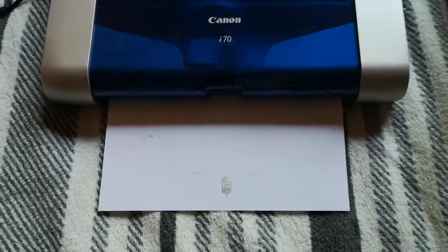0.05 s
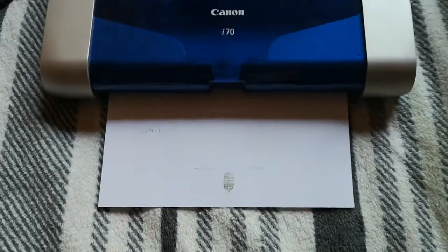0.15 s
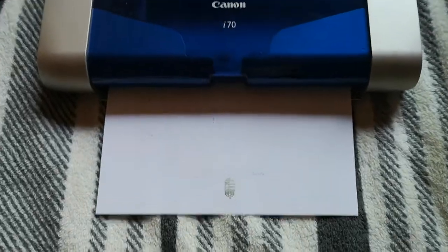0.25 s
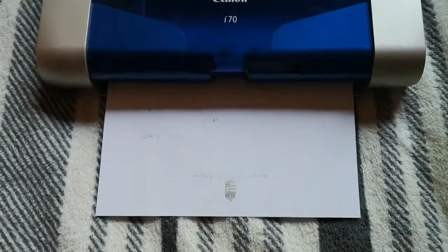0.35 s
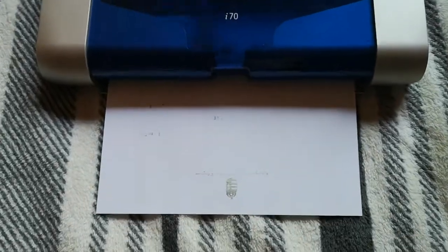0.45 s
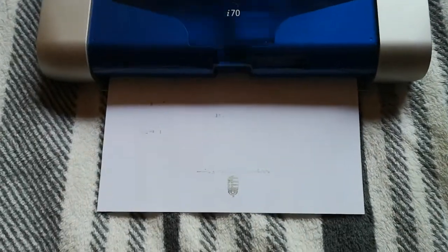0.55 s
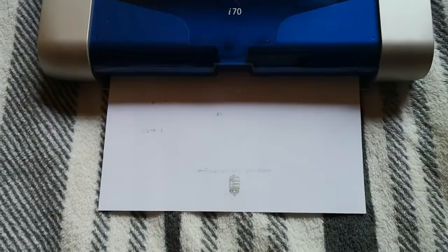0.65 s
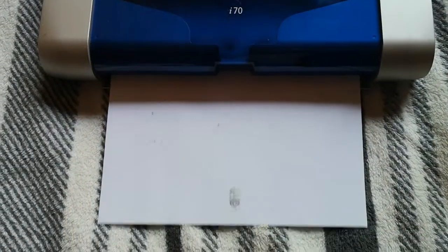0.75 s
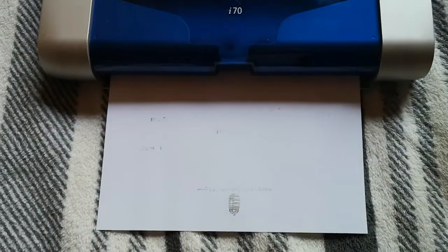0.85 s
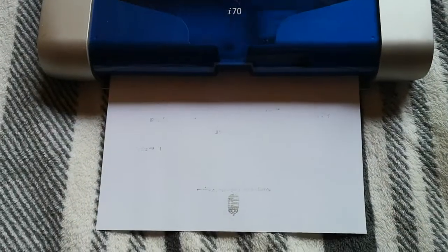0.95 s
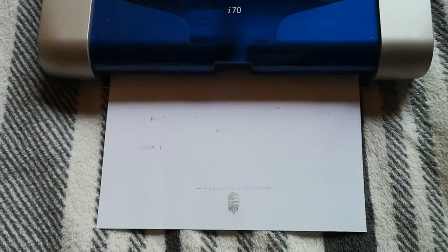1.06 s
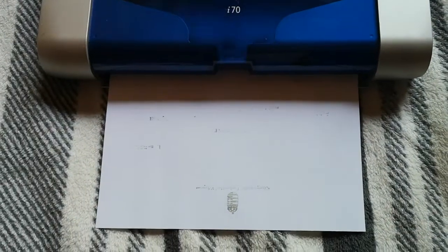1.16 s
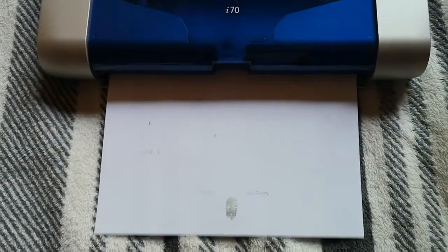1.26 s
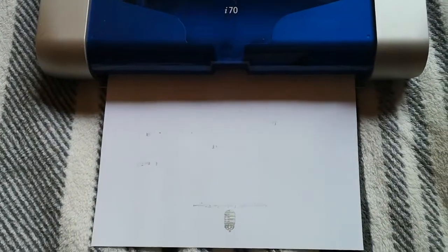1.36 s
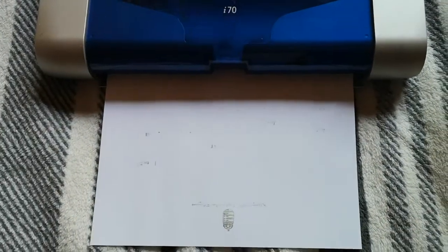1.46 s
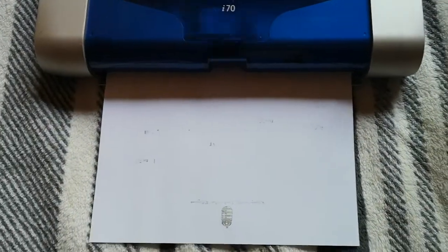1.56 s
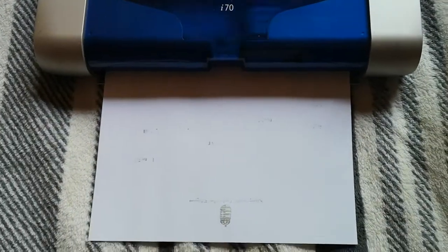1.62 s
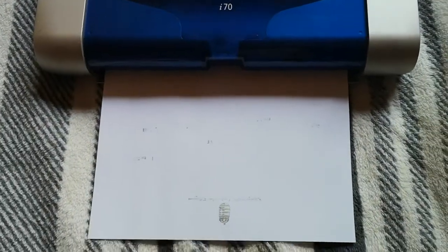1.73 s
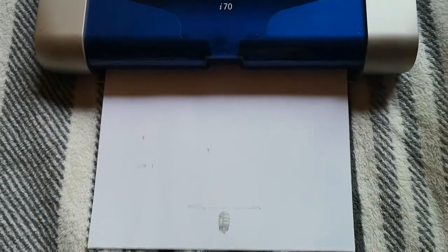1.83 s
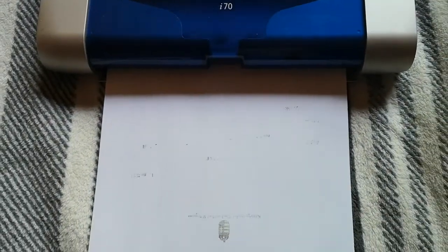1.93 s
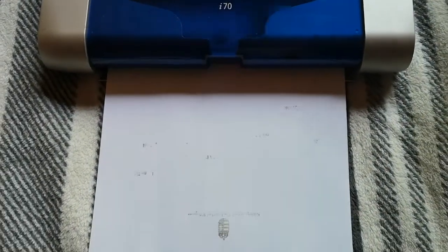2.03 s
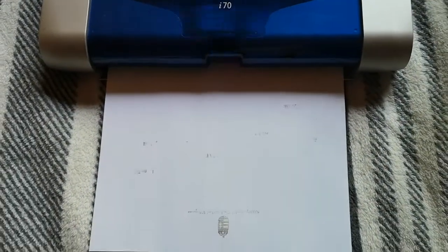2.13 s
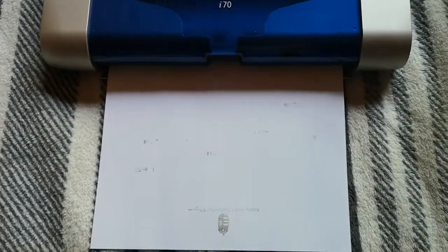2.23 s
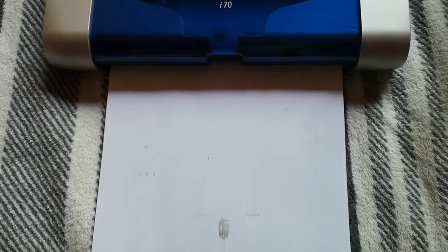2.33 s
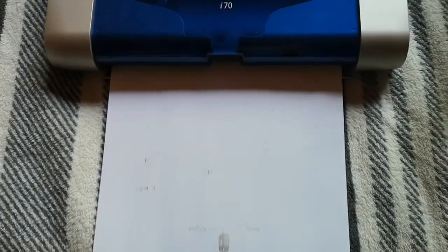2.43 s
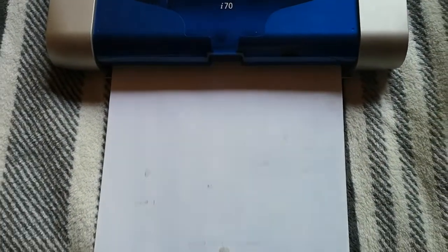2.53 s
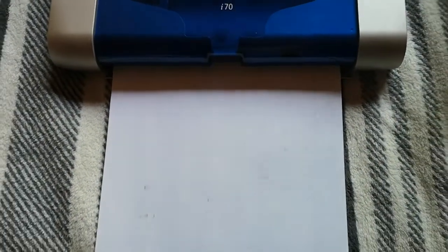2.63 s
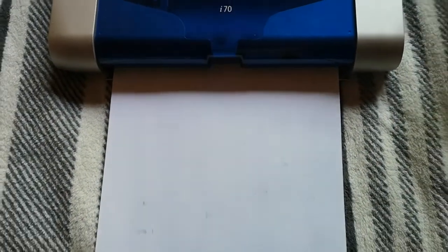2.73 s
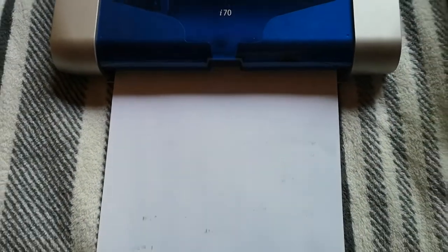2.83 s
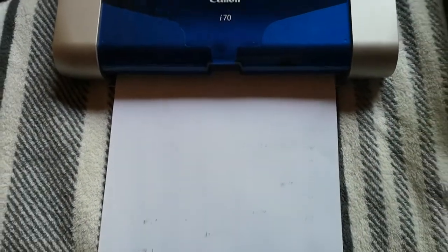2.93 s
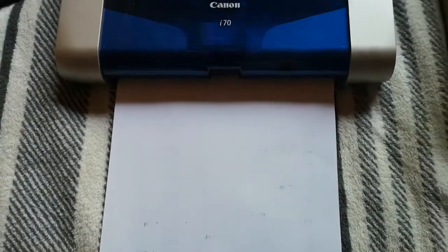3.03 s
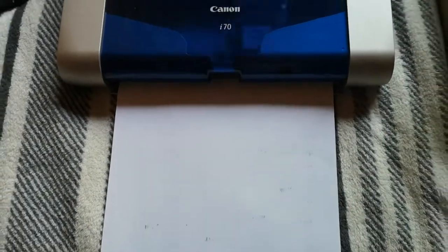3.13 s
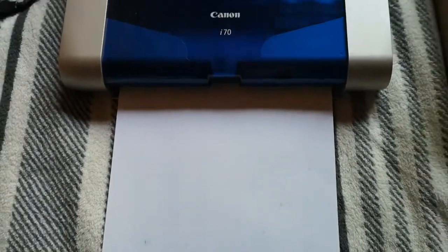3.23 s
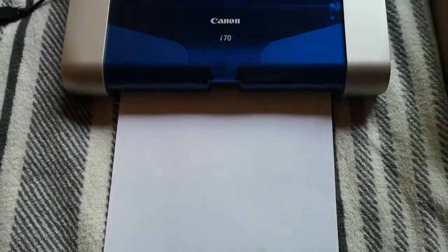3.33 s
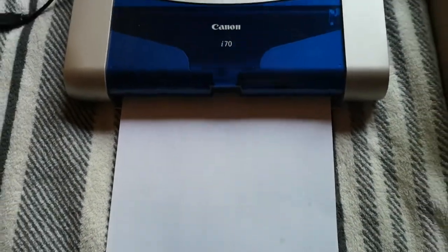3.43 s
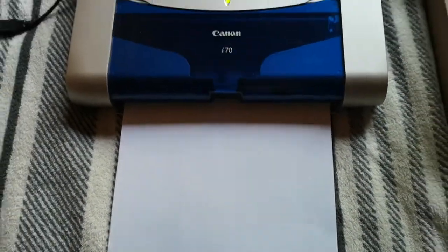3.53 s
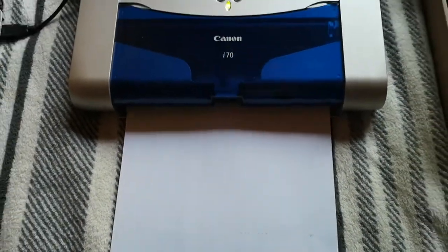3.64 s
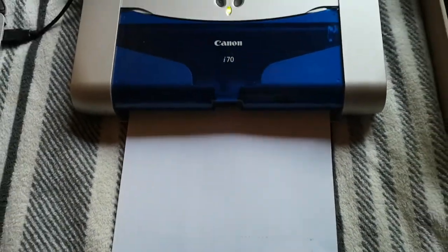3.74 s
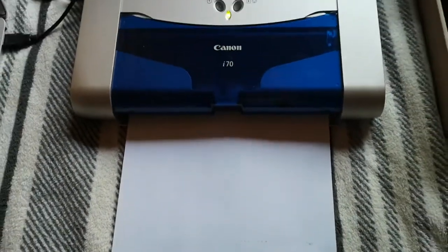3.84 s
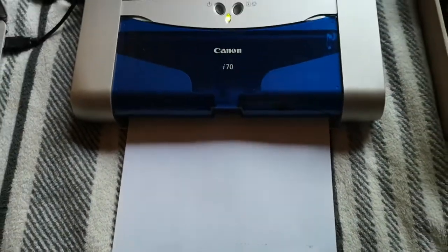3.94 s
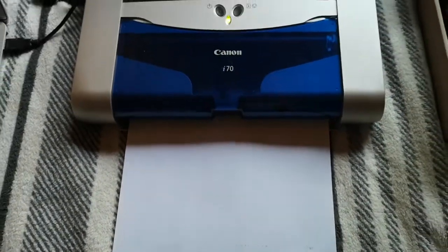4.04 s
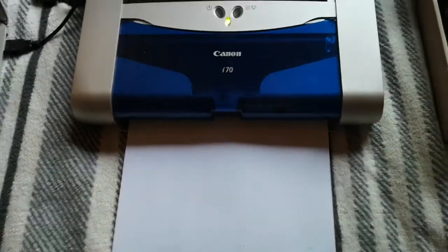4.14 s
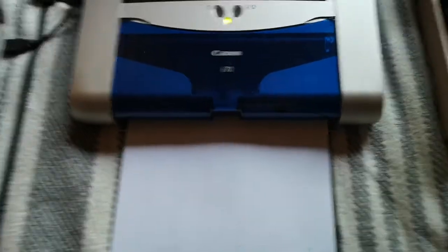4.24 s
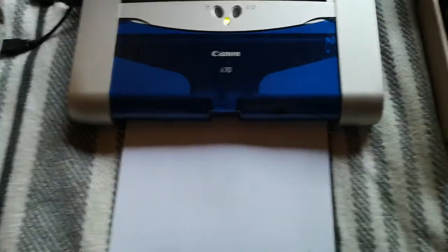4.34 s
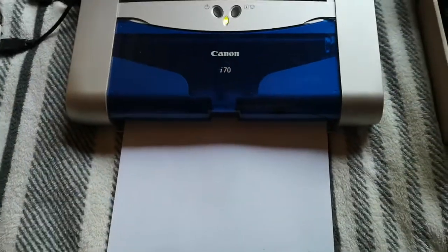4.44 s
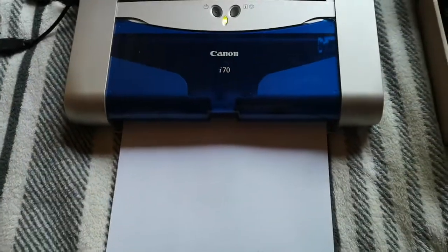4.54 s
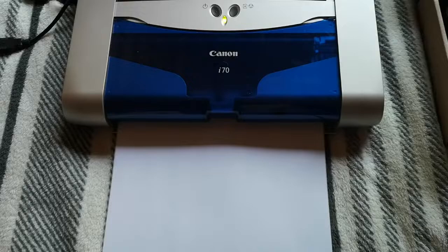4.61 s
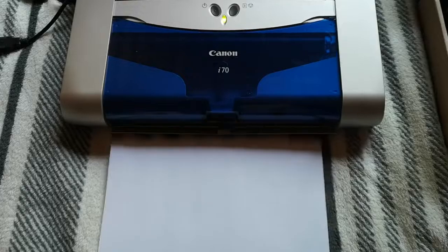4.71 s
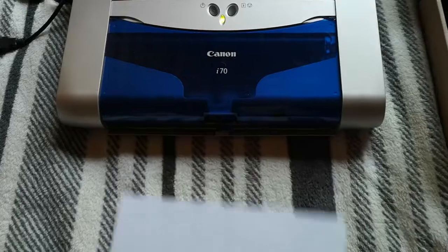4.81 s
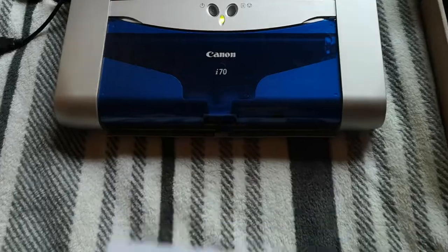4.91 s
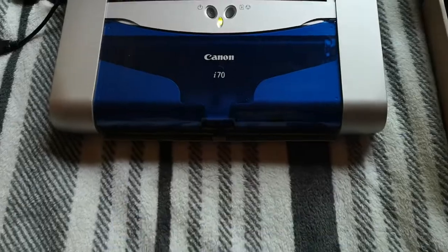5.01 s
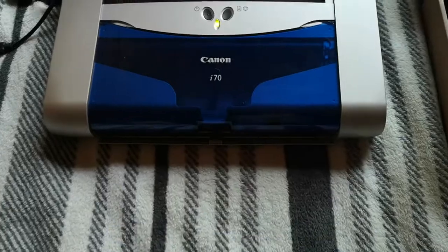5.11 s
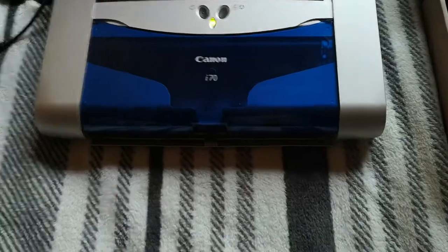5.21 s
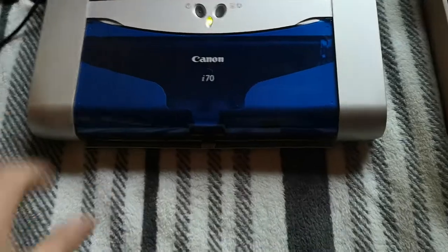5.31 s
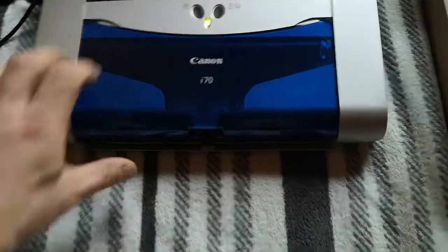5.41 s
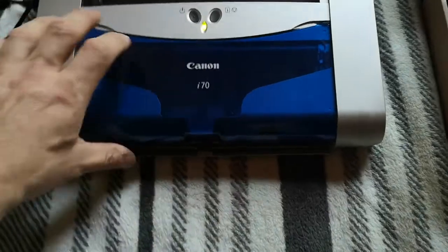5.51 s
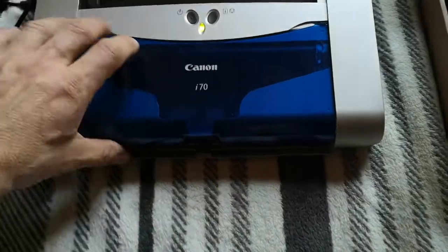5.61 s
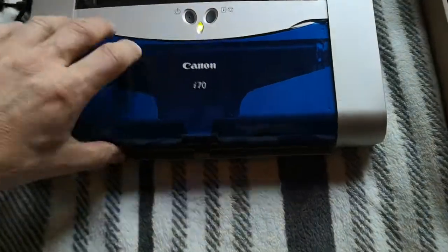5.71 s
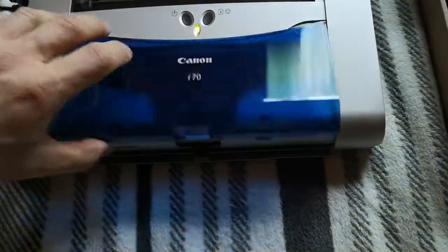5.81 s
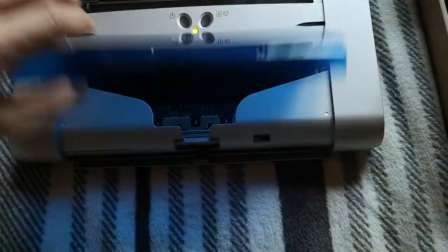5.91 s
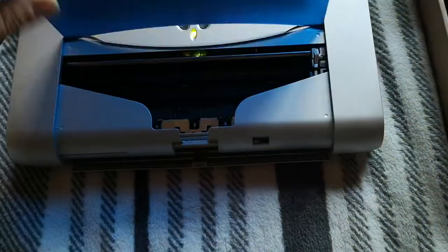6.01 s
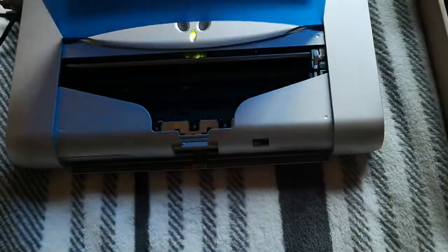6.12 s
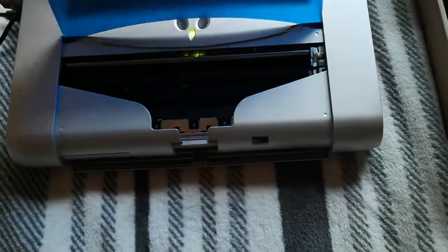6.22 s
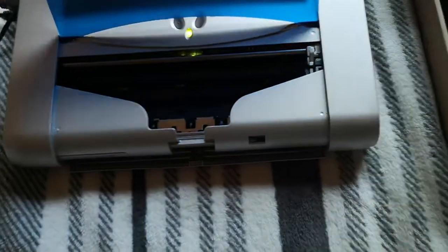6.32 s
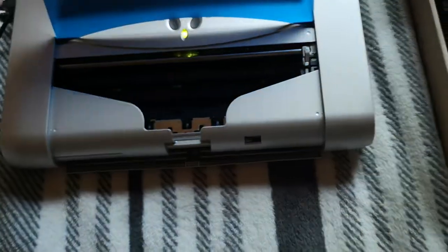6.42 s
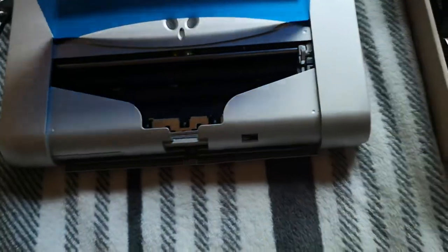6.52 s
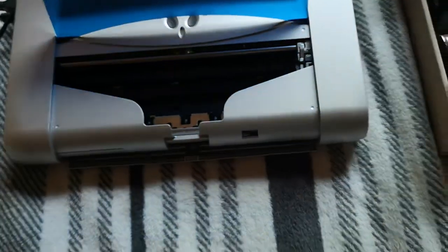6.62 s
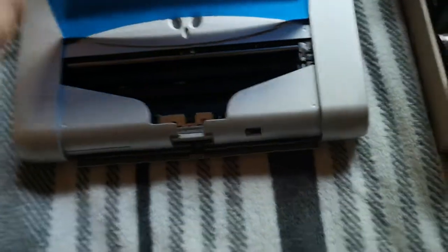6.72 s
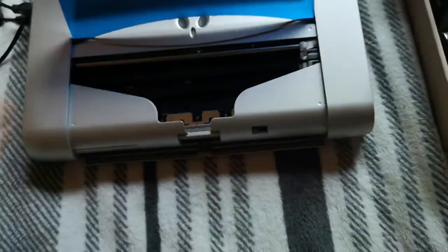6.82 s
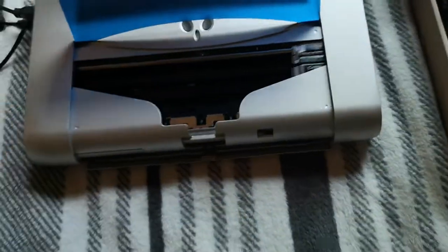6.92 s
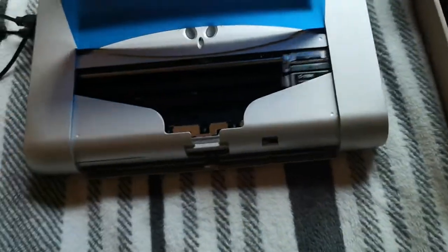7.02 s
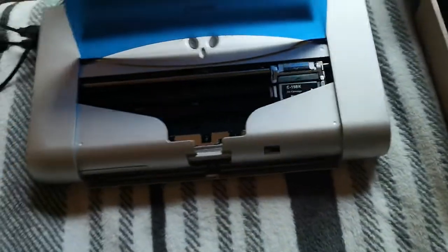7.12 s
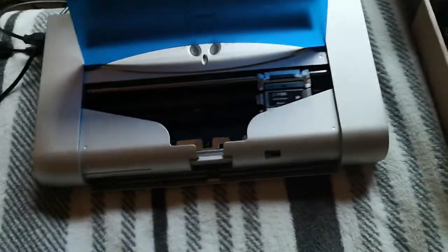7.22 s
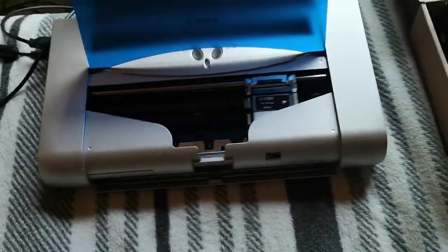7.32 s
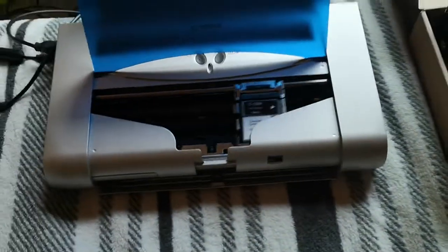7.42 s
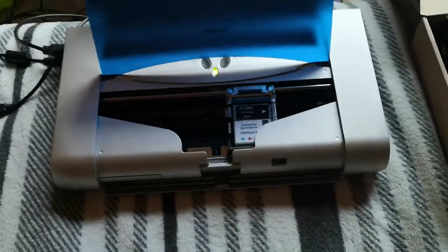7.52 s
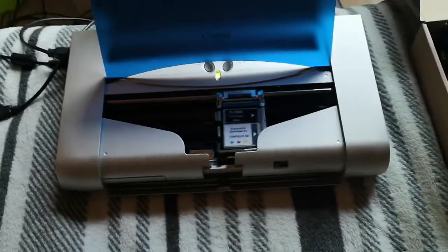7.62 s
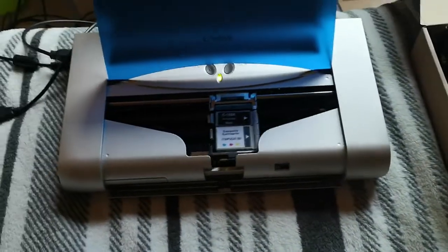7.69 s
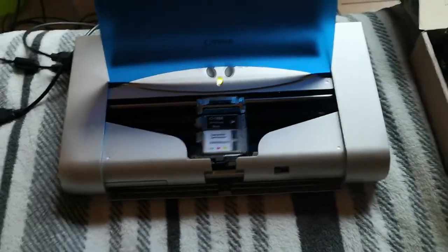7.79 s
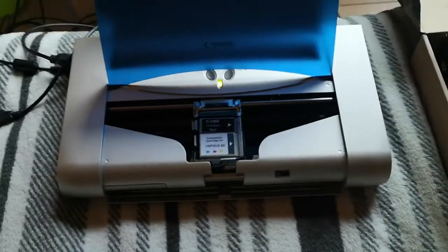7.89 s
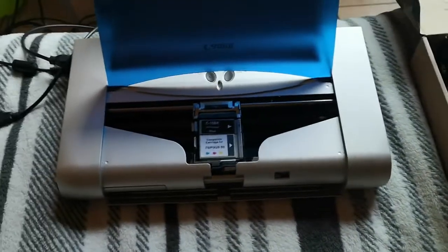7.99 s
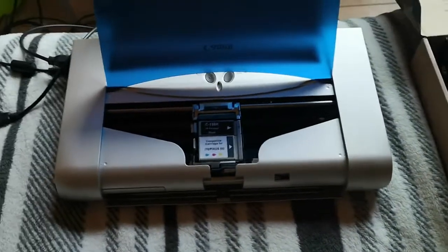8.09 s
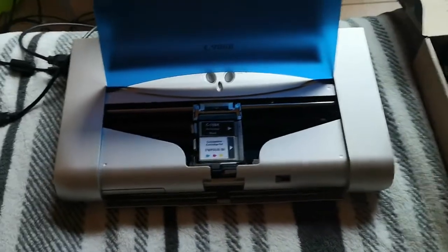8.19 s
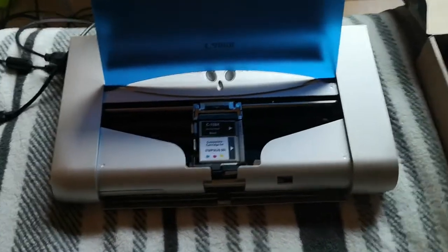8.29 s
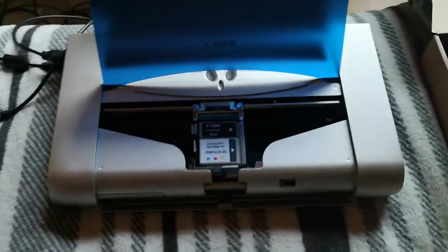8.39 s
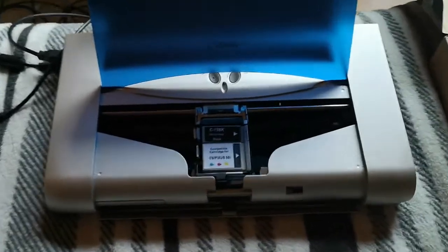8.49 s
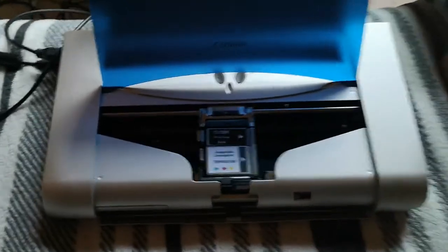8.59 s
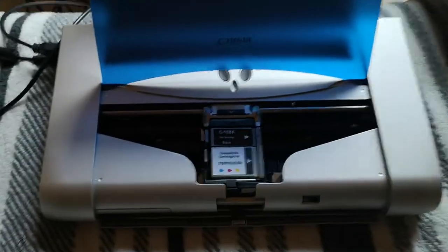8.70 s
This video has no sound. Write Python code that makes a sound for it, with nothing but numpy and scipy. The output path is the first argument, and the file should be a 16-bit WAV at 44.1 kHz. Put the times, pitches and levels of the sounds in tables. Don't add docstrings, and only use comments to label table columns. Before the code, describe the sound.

Close up, printer gears grind and knock, the print head whirs back and forth, then a sharp lid snap and a faint creeping carriage.

```python
import sys
import numpy as np
from scipy import signal
from scipy.fft import rfft, irfft, next_fast_len
from scipy.io import wavfile
from scipy.ndimage import uniform_filter1d

SR = 44100
rng = np.random.default_rng(int(sys.argv[2]) if len(sys.argv) > 2 else 0)


def wrap_up_sound(samples):
    columns = np.atleast_2d(samples).T
    tamed = np.clip(columns, -1, 1)
    steps = np.round(tamed * 32767).astype(np.int16)
    wavfile.write(sys.argv[1], SR, steps)


def magnitude_from_level(level_db):
    exponent = np.asarray(level_db, float) / 20
    return 10 ** exponent


N = 385875
SIZE = next_fast_len(N + 8192)
HZ = np.maximum(np.arange(SIZE // 2 + 1) * SR / SIZE, 1)
TIME_S = np.arange(N) / SR

# frequency in Hz, level in dB per Hz.
MIC_HISS = [(180, -29), (300, -6.5), (584, -21), (634, -19), (1660, -14.5), (1970, -12), (2140, -12),
            (3950, -21.5), (4910, -18.5), (8220, -23.5), (16000, -34)]
MIC_HISS_DB = -74
# level in dB, turning points (s, Hz), twin level in dB where it differs.
WHINES = [(-83, [(1.78, 8900), (1.82, 9050), (1.88, 9750), (1.96, 8800)]), (-84, [(2.14, 8200),
          (2.22, 7550), (2.29, 8200), (2.345, 7500), (2.42, 8400), (2.49, 7600)]), (-88, [(4.12, 5800),
          (4.165, 8600)], -40), (-86, [(6.68, 4750), (6.74, 5150)], -40), (-84, [(4.17, 8300), (4.22, 8800),
          (4.24, 8750), (4.27, 8950), (4.305, 8300)], -40), (-84, [(4.175, 7900), (4.2, 7950), (4.24, 7750),
          (4.27, 7850), (4.32, 7400)], -40), (-83, [(4.385, 7600), (4.437, 9300), (4.487, 7500),
          (4.54, 9900), (4.6, 7600)], -40), (-88, [(4.45, 10000), (4.49, 8500), (4.53, 9900)], -40),
          (-89, [(4.57, 9700), (4.63, 7300)], -40), (-85, [(6.65, 8100), (6.67, 8500), (6.7, 8250),
          (6.745, 9150), (6.8, 7850), (6.83, 8200)], -40), (-87, [(6.65, 8000), (6.69, 7950), (6.745, 8450),
          (6.795, 7150), (6.82, 7400)], -40), (-85, [(6.86, 9500), (6.88, 9700), (6.92, 8300), (6.97, 9100),
          (7.0, 8500)], -40), (-86, [(6.86, 8500), (6.875, 8600), (6.92, 7500)], -40), (-86, [(6.915, 8000),
          (6.94, 7900), (6.98, 8150)], -40), (-88, [(7.07, 8100), (7.16, 9300)])]
TWIN_RATIO, TWIN_DB, LOW_TWIN_RATIO, LOW_TWIN_DB = .905, -4, .57, -7
# time in seconds, level in dB.
GRIP_LEVEL = [(0.0, -59), (0.63, -57), (0.83, -65), (0.97, -57.5), (1.19, -59), (4.0, -58.5), (6.63, -61),
              (7.36, -55.5), (7.99, -55), (8.14, -52.5), (8.75, -59)]
# frequency in Hz, level in dB per Hz.
GRIP_SPECTRUM = [(7.1, -34.5), (12, 3.5), (27, -1), (54, -10.5), (204, -25), (317, -40.5), (379, -61),
                 (600, -48), (780, -82.5), (1320, -120)]
# start in seconds, frequency in Hz, peak in dB, t60
# in seconds.
SOFT_BUMPS = [(5.89, 355, -46.5, 0.12), (7.362, 44.5, -32.5, 0.26), (7.48, 190, -64, 0.075),
              (7.68, 171, -64, 0.071), (7.92, 220, -67, .07), (8.3, 200, -62, .08),
              (8.107, 26.9, -40, 0.28), (8.269, 35.5, -41, 0.14)]
# start in seconds, end in seconds, level in dB.
ARM_REACH = (5.42, 6.02, -73)
# frequency in Hz, likeness from -1 to 1.
PORT_LIKENESS = [(60, 1), (180, 0.99), (550, 0.73), (1650, 0.29), (4970, 0.063), (15000, -0.12)]
# frequency in Hz, left minus right in dB.
PORT_TILT = [(60, 0), (110, -0.5), (200, 0.5), (380, -1.5), (700, -1), (1290, -8), (2380, -8), (4400, 1.5),
             (8120, -5), (15000, -18.5)]
COHERENT = .4
ROOM_T60_S, ROOM_DB = 0.17, -12.5

# start in seconds, end in seconds, frequency in Hz, level in dB.
CREAKS = [(5.97, 6.07, 1470, -59), (5.96, 6.06, 1310, -60), (6.065, 6.1, 1660, -57),
          (6.17, 6.235, 1350, -64), (6.25, 6.32, 1540, -53), (6.335, 6.39, 1510, -57),
          (6.61, 6.65, 1800, -58), (6.605, 6.645, 1500, -61), (6.605, 6.625, 4050, -67),
          (6.97, 7.01, 1520, -68), (6.745, 6.775, 2950, -70), (6.605, 6.63, 2420, -66)]
# peak in seconds, swell in dB/s, fade in dB/s, dull level in dB, bright in dB re dull.
STROKES = [(4.22, 200, 30, -73, -17), (4.33, 250, 200, -67.5, 0.1), (4.47, 60, 40, -69, -7),
           (4.842, 170, 206, -61, -3), (5.105, 159, 350, -65.5, -10), (4.95, 31, 41, -73.5, -1.2),
           (5.753, 36, 33, -70.5, 4.5), (4.76, 300, 100, -69, -7), (5.94, 34.5, 43, -68, -11),
           (5.9, 68, 60, -61.5, -8), (6.11, 145, 173, -59, -8), (6.35, 24, 98, -75.5, -2.5),
           (6.2, 120, 95, -64.5, -16), (6.9, 39, 19, -71.5, -10.5)]
STEEPEN = 1.78
# frequency in Hz, level in dB per Hz.
RUB_SPECTRUM = [(180, -29), (300, -5.5), (440, -9.5), (603, -20.5), (774, -12.5), (946, -10), (2170, 2.5),
                (3700, -12), (4910, -11.5), (7440, 2.5), (10600, -20), (14700, -19), (16000, -29.5)]
# frequency in Hz, width in Hz, lift in dB.
RUB_MODES = [(2174, 300, 2.5), (5000, 1700, 10.5), (5780, 500, 2), (7300, 840, 0), (9140, 780, 11)]
# start in seconds, peak in dB, thud in dB re peak, snap in dB re peak, t60 in seconds.
TAPS = [(4.318, -43, -22, -34, 0.087), (4.7528, -51.5, -11, 0.5, 0.078), (4.8051, -56, -20, -10, .05),
        (4.8211, -52, -22, -12, 0.085), (4.838, -57.5, -22, -2, .06), (5.066, -57, -23, -23, .07),
        (5.0997, -55, -27, -4, .06), (5.109, -64, -22, 5, 0.046), (5.197, -71, -3, 7.5, 0.11),
        (5.72, -62, -14, -20, .06), (5.8025, -56, 7.5, -5, 0.053), (5.86, -48.5, -7.5, -9, 0.068),
        (5.887, -25.5, -8.5, 5.5, 0.089), (5.9052, -29.5, -16, 3, 0.14), (6.071, -48.5, -10.5, 0.5, 0.39),
        (6.078, -60, -12, -5, 0.094), (6.11, -54, -2, -17.5, .06), (6.137, -55.5, 6.5, -18, 0.065),
        (6.167, -45, -3, -30, 0.044), (6.2544, -39, -11, -16, 0.09), (6.284, -45, -46, -30, 0.073),
        (6.3385, -55, -12, -30, 0.16), (6.37, -50, -16, -25, 0.051), (6.614, -58, -36, -1.5, 0.16),
        (6.621, -62, -20, -12, .07), (6.656, -51, -22, -20, .05), (6.715, -60, -20, -20, .05),
        (6.733, -57, -18, -18, 0.062), (6.669, -64.5, 4.5, -23, 0.13), (6.876, -59, 5.5, -23, 0.1),
        (6.9485, -75, 7.5, -11, 0.23), (8.0124, -65, -2, -16, 0.067)]
# frequency in Hz, level in dB per Hz.
PLASTIC = [(88, -19), (150, -1), (231, -13.5), (270, -2.5), (309, -25.5), (466, -11), (689, 0), (871, -3),
           (2020, 1), (6020, -21), (9080, -23), (14800, -65.5), (16000, -52.5)]
# frequency in Hz, width in Hz, lift in dB.
PLASTIC_MODES = [(1510, 770, 6), (1880, 240, 5), (2650, 170, 6), (5600, 730, 1)]

# start in seconds, end in seconds, drive in dB, rail in dB, crossing of the ribs in seconds.
SWEEPS = [
    (0.09, 0.386, -62.5, -68.5, .3274),
    (0.572, 0.872, -58.5, -63, .6455),
    (1.07, 1.387, -64.5, -69.5, 1.3179),
    (1.62, 1.941, -59, -63.5, 1.6915),
    (2.172, 2.475, -64.5, -65, 2.4179),
    (3.123, 3.308, -59, -59.5, 3.1666),
]
# start in seconds, end in seconds, drive in dB, rail in dB.
CREEP = (7, 8.03, -79.5, -71.5)
TURN_S, CREEP_TURN_S, FIRST_KICK_S, CREEP_KICK_S, SECOND_KICK = .033, .054, .005, 6.9956, .43
# frequency in Hz, width in Hz, level in dB.
FRAME = [(612, 66, 0.6), (759, 80, -9.5), (174.7, 15, 2.5)]
# frequency in Hz, width in Hz, level in dB.
RAIL = [(1262, 67, 8), (1107, 29, -13), (1450, 24, -11.5)]
# frequency in Hz, width in Hz, level in dB.
FAST_RAIL = [(1218, 22, -2), (1279, 22, .1), (1160, 25, -10)]
FAST_KICK = .3
# frequency in Hz, width in Hz, level in dB.
CASE = [
    [(1850, 110, 2.5), (1970, 60, -3), (2250, 110, -1), (2586, 200, -10.5)],
    [(1460, 30, 0.5), (1696, 45, -3), (1822, 68, 3.5), (2245, 90, 1), (2400, 55, -4), (2630, 200, -13)],
]
# frequency in Hz, width in Hz, lift in dB.
HOLLOW = [(396, 200, -6), (950, 250, -5)]
# time in seconds, level in dB.
CREEP_RING = [(7, 2), (7.15, 0.5), (7.4, 3), (7.6, 0.5), (7.8, -0.8), (8.03, 0.5)]
# frequency in Hz, level in dB per Hz.
SLIDE = [(1760, -34.5), (3000, -5), (3900, 4), (4400, -2), (5770, -3), (8990, -4), (10300, -15),
         (15000, -21.5)]
# frequency in Hz, width in Hz, lift in dB.
SLIDE_MODES = [(7700, 400, 3), (9200, 500, 3)]
# frequency in Hz, gain in dB.
LID_OPEN = [(3000, -3.5), (5000, -13.5), (7500, 5), (12000, 5)]
# seconds from the crossing time when going out, level in dB.
RIBS = [(-.097, -8.5), (-.085, -8), (-.035, -7), (-.024, 0), (-.012, -4.5), (0, -1.5), (0.0094, -1.5)]
RIB_DB, RIB_T60_S = -64, 0.041
RAMP_S, BRAKE_S, CREEP_BRAKE_S = 0.068, 0.053, .012
LATE_RING_S = 0.075
FRAME_RE_DRIVE_DB = np.array([3, -5, -8.5, -6.5])
CASE_RE_DRIVE_DB = np.array([0.5, 0, 0.5, -8])
RAIL_RUN_DB, RAIL_TILT_DB = np.array([-4.5, 0, 0, -12.5]), 0.5
SLIDE_DB, SLIDE_RUN_DB = -71.5, np.array([-4, 0, 0, -7.5])
CREEP_SLIDE_DB, CREEP_FRAME_DB = -3.5, -5

# start in seconds, end in seconds, gear load in dB, clutch clunk peak in dB.
FEED = [
    (-.1, 0.068, -46.5, -40),
    (0.3811, 0.545, -45, -30),
    (0.8694, 1.049, -45, -27.5),
    (1.417, 1.586, -45.5, -45),
    (1.9575, 2.149, -45, -31),
    (2.4844, 3.099, -46, -32.5),
    (3.35, 3.999, -47, -47.5),
]
# frequency in Hz, level in dB per Hz.
GEARBOX = [(120, -42.5), (200, -12.5), (432, -12.5), (696, -3.5), (899, -12.5), (1080, -5.5), (1680, -8.5),
           (2020, -2.5), (4120, -12.5), (6050, -15.5), (7680, -12.5), (13600, -34), (16000, -47)]
# frequency in Hz, width in Hz, lift in dB.
GEAR_MODES = [(318, 56, -3.5), (590, 25, 2.5), (696, 36, 4.5), (806, 90, 4.5), (900, 54, -2),
              (1760, 470, 6), (2207, 270, 5), (4700, 460, 1), (7440, 760, 4), (9130, 500, 7)]
# frequency in Hz, width in Hz, level in dB.
HUM = [(127.8, 11, 2), (197, 9.7, -6), (240, 17, -9.5)]
# frequency in Hz, width in Hz, level in dB.
BRAKE_HUM = [(187, 16, 0)]
BRAKE_HUM_DB = [-21.5, -19, -15, -13, -20.5]
SPIN_UP_S, SLOW_S, STOP_S = 0.039, 0.051, 0.023
SPEED_DB = np.array([-7.5, 0, 0, -5, -17.5])
HUM_STRAIN_DB = np.array([5.5, 0, 2.75, 0, -6])
HUM_RE_DB, HISS_RE_DB, HISS_FOLLOWS = -11.5, -6, 2.8
SHEET_GONE_S, SHEET_GONE_DB = 3.79, -12.5
# start in seconds, peak in dB, touch before it in dB re peak, snap in dB re peak.
DROPS = [(0.4968, -19, -20, -23), (1.4474, -21, -26, -7), (2.0177, -20, -5, -12.5),
         (2.5537, -20, -4.5, -15.5), (2.6998, -18.5, -3.5, -13), (2.8466, -17.5, -6.5, -12),
         (2.9918, -16.5, -15, -15), (3.45, -22.5, -2.5, -8.5), (3.5981, -24.5, 2, -8), (3.743, -23, -3, -7),
         (3.89, -22.5, -4, -8)]
TOUCH_LEAD_S, TOUCH_DULL_DB, DROP_THUD_DB = .0055, -5.5, -17.5
# start in seconds, peak in dB, rebound in dB re peak.
CATCHES = [(.4244, -25, -6.5), (0.9495, -24.5, -11), (1.5177, -23, -11), (2.0878, -24, -10),
           (2.6236, -24.5, -9.5), (2.7697, -25, -5.5), (2.9161, -23.5, -11), (3.5217, -26.5, -0.7),
           (3.6668, -29.5, 1), (3.814, -28, -1.5), (3.9369, -34, 3.5)]
REBOUND_S, CATCH_THUD_DB, CATCH_SNAP_DB, CLUNK_THUD_DB, CLUNK_SNAP_DB = .0153, -15, -15, -14, -22.5
# start in seconds, peak in dB, snap in dB re peak.
TICKS = [(.008, -29, -10.5), (.047, -32.5, -19.5), (0.5307, -33.5, -12), (0.88, -32, -15),
         (2.518, -37.5, -21), (2.4898, -34, -27), (2.9653, -35.5, 4), (3.1, -33, -20), (3.083, -35, -26),
         (1.541, -36, -10), (1.558, -36.5, -18), (.57, -46.5, -21), (1.616, -53, -29), (3.388, -30, -22.5)]
# seconds from it (negative before), peak in dB, thud in dB re
# peak, snap in dB re peak.
NEAR_DROP = [(-.016, -38, -13.5, -21.5), (.013, -36, -8.5, -19.5), (.030, -33.5, -16.5, -19.5),
             (.048, -38.5, -5, -21)]
# seconds from it, peak in dB, thud in dB re peak, snap in dB re peak.
AFTER_CATCH = [(.005, -38, -22.5, -5), (.024, -37.5, -4.5, -20.5), (.048, -45, -13.5, -9.5)]
LONG_FEED_S = .3
# time in seconds, hardness.
BARE_GEARS = [(1.5, 0.012), (3.45, .22)]
# frequency in Hz, level in dB, t60 in seconds.
DROP_RING = [(694, -8.5, 0.039), (761.4, -12, 0.049), (1849, -3, .03), (2002, -1, .028), (2234, -3, 0.026),
             (2330, -10, .025), (2670, -7.5, 0.028), (3064, -12.5, 0.026), (3746, -14, 0.02),
             (4610, -12.5, 0.022), (7740, -10, .022)]
# frequency in Hz, level in dB, t60 in seconds.
CATCH_RING = [(584, -9.5, .035), (690, -13, 0.028), (791, -12.5, .03), (1270, -13, .02),
              (1510, -10.5, 0.018), (1780, -5, .02), (2004, 3.5, .018), (2270, -3.5, .02),
              (2720, -11, 0.017)]
CAM_RING_DB, CAM_RATTLE_DB, CAM_VARIES_DB, CAM_RISE_CYCLES = -0.92, -5.5, 1.8, 0.91


def in_time(tables, edge_s=.004):
    rows = []
    for table in tables:
        off = [-130] * (len(table[0]) - 1)
        rows.append([table[0][0] - edge_s] + off)
        rows += [list(row) for row in table]
        rows.append([table[-1][0] + 9 * edge_s] + off)
    s, *columns = np.transpose(rows)
    return [np.interp(TIME_S, np.maximum.accumulate(s), column) for column in columns]


def at_hz(points):
    hz, value = np.array(points).T[:2]
    return np.interp(np.log(HZ), np.log(hz), value)


def lifted(points, modes=()):
    lift_db = sum(db / (1 + (2 * (HZ - hz) / width) ** 2) for hz, width, db in modes)
    return magnitude_from_level(at_hz(points) + lift_db)


def resonant(modes):
    return sum(magnitude_from_level(db) / (1 + (2 * (HZ - hz) / width) ** 2) ** 0.56 for hz, width, db in modes)


def band(low_hz, high_hz):
    return 1 / np.sqrt((1 + (low_hz / HZ) ** 6) * (1 + (HZ / high_hz) ** 6))


def filtered(x, gain):
    return irfft(rfft(x, SIZE) * gain, SIZE)[..., :N]


def colour(x, gain):
    cepstrum = irfft(np.log(gain / np.sqrt(np.mean(gain ** 2)) + 1e-5), SIZE)
    cepstrum[1:SIZE // 2] *= 2
    cepstrum[SIZE // 2 + 1:] = 0
    return filtered(x, np.exp(rfft(cepstrum)))


def drift(rate):
    r = np.exp(-80 * np.pi * rate / SR)
    slow = signal.lfilter([1], [1, -2 * r, r * r], rng.standard_normal(N // 40 + 2002))[2000:]
    return np.interp(np.arange(N) / 40, np.arange(len(slow)), slow / slow.std())


def noise():
    return rng.standard_normal((2, N))


def dying(at_s, peak_db, t60_s, rise_s=.0004):
    out = np.zeros(N)
    for s, db, t60 in zip(at_s, peak_db, np.broadcast_to(t60_s, len(at_s))):
        start, t60 = int(s * SR), max(t60, .005)
        t = np.arange(int(t60 * SR)) / SR
        shape = (magnitude_from_level(db - 60 * t / t60) * (1 - np.exp(-t / rise_s)))[:N - start]
        out[start:start + len(shape)] += shape
    return out


def blows(at_s, peak_db, thud_db, snap_db, t60_s, gain, trim_db, crack_db, hard):
    def shake(db, t60, low_hz, high_hz):
        crack = np.zeros(N)
        crack[(at_s * SR).astype(int) + 20] = magnitude_from_level(db + crack_db)
        return colour(crack + noise() * dying(at_s, db, t60), gain * band(low_hz, high_hz))
    thud = shake(peak_db + thud_db, 1.52 * t60_s, 100, 1070)
    ring = shake(peak_db, t60_s, 1200, 5300)
    snap = shake(peak_db + snap_db, 0.6 * t60_s, 4500, 25000)
    snap += hard * signal.lfilter([1, -2, 1], [1], snap)
    return magnitude_from_level(trim_db) * (magnitude_from_level(4.5) * thud + ring + magnitude_from_level(6.0) * snap)


def microphone_hiss():
    return magnitude_from_level(MIC_HISS_DB + 1.5) * colour(noise(), lifted(MIC_HISS) * band(290, 17000))


def whine():
    out = np.zeros(N)
    for db, rows, *own_db in WHINES:
        s, hz = np.transpose(rows)
        t = np.arange(int(s[0] * SR), int(s[-1] * SR))
        place = np.interp(t / SR, s, np.arange(len(s)))
        eased = np.floor(place) + (1 - np.cos(np.pi * (place % 1))) / 2
        turns = 2 * np.pi * np.cumsum(np.interp(eased, np.arange(len(s)), hz)) / SR
        twin_db = min([TWIN_DB, *own_db]) + 4 * np.sin(9 * t / SR * np.pi)
        low_twin_db = min([LOW_TWIN_DB, *own_db])
        tone = np.sin(turns) + magnitude_from_level(twin_db) * np.sin(TWIN_RATIO * turns)
        tone += magnitude_from_level(low_twin_db) * np.sin(LOW_TWIN_RATIO * turns)
        out[t] = magnitude_from_level(db + 8) * signal.windows.tukey(len(t), .3) * tone
    return out * magnitude_from_level(2 * drift(25))


def grip():
    level_db = in_time([GRIP_LEVEL])[0] + 1.9 * drift(6.4)
    rumble = colour(noise() * magnitude_from_level(level_db), lifted(GRIP_SPECTRUM) * band(4.1, 700))
    bumps = sum(-np.sin(2 * np.pi * hz * (TIME_S - s)) * dying([s], [db], t60, rise_s=0.0041)
                for s, hz, db, t60 in SOFT_BUMPS)
    start, end, reach_db = ARM_REACH
    swell = np.sin(np.pi * np.clip((TIME_S - start) / (end - start), 0, 1))
    rustle = magnitude_from_level(reach_db) * swell * colour(noise()[0], band(170, 300) ** 2)
    return bumps + rustle + rumble[0] + magnitude_from_level(-19.0) * rumble[1] * [[1], [-1]]


def room(x):
    t = np.arange(8000) / SR
    tail = rng.standard_normal((2, len(t))) * magnitude_from_level(-60 * t / ROOM_T60_S) * (t > .004)
    tail /= np.sqrt(np.sum(tail ** 2, axis=1, keepdims=True))
    return magnitude_from_level(ROOM_DB) * filtered(x, rfft(tail, SIZE) * band(140, 7000))


def two_ports(paths):
    alike, tilt_db = np.clip(at_hz(PORT_LIKENESS), -.99, .999), at_hz(PORT_TILT) / 2
    direct, scattered = rfft(paths, SIZE)
    mid = direct * np.sqrt((1 + alike) / 2)
    side = 1j * COHERENT * direct + np.sqrt(1 - COHERENT ** 2) * scattered
    side = side * np.sqrt((1 - alike) / 2)
    return irfft([(mid + side) * magnitude_from_level(tilt_db), (mid - side) * magnitude_from_level(-tilt_db)], SIZE)[:, :N]


def hinge():
    out = np.zeros(N)
    for start, end, hz, db in CREAKS:
        t = np.arange(int((end - start) * SR)) / SR
        wobble = np.cumsum(rng.standard_normal(4410))[:len(t)] * .065
        turns = 2 * np.pi * hz * t[:len(wobble)] + wobble
        tone = np.sin(turns) + .2 * np.sin(1.34 * turns) + .1 * np.sin(2.35 * turns)
        swell = np.abs(np.sin(np.pi * t[:len(tone)] / t[-1])) ** 0.21
        out[int(start * SR):][:len(tone)] += magnitude_from_level(db) * tone * swell
    return out * magnitude_from_level(2 * drift(50))


def rub_levels():
    t, dull, bright = np.arange(0, N / SR + .01, .002), 1e-13, 1e-13
    for s, swell, fade, dull_db, bright_db in STROKES:
        lost_db = np.where(t < s, swell * (s - t), fade * (t - s))
        power = magnitude_from_level(2 * (dull_db - 10 * (lost_db / 10) ** STEEPEN))
        dull, bright = dull + power, bright + power * magnitude_from_level(2 * bright_db)
    return [np.interp(TIME_S, t, 10 * np.log10(power)) for power in (dull, bright)]


def handling():
    dull_db, bright_db = rub_levels()
    rubbing, grain = lifted(RUB_SPECTRUM, RUB_MODES), magnitude_from_level(2.0 * drift(58.4))
    rub = colour(noise() * grain * magnitude_from_level(dull_db - 5.0), rubbing * band(240, 2400))
    rub += colour(noise() * grain * magnitude_from_level(bright_db + 1.5), rubbing * band(2800, 17000))
    s, peak_db, thud_db, snap_db, t60 = np.transpose(TAPS)
    plastic = lifted(PLASTIC, PLASTIC_MODES)
    return rub + blows(s, peak_db, thud_db, snap_db, t60, plastic, trim_db=-8, crack_db=1, hard=0.39)


def sweep_levels():
    def sweep(start, end, drive_db, rail_db, way, frame_db=0, slide_db=SLIDE_DB, brake_s=BRAKE_S):
        along = way * np.array([-1, -1, 1, 1])
        return np.transpose([[start, start + RAMP_S, end - brake_s, end],
                             drive_db + frame_db + FRAME_RE_DRIVE_DB,
                             rail_db + RAIL_RUN_DB - RAIL_TILT_DB * along,
                             drive_db + CASE_RE_DRIVE_DB,
                             slide_db + SLIDE_RUN_DB])
    fast = [sweep(*row[:4], (-1) ** k) for k, row in enumerate(SWEEPS)]
    return in_time(fast + [sweep(*CREEP, -0.86, CREEP_FRAME_DB, SLIDE_DB + CREEP_SLIDE_DB, CREEP_BRAKE_S)])


def ribs():
    ticks = [(row[4] + (-1) ** k * lag, RIB_DB + db) for k, row in enumerate(SWEEPS) for lag, db in RIBS]
    s, db = np.transpose(ticks)
    return dying(s, db + rng.normal(0, 2.7, len(s)), RIB_T60_S)


def pole_kicks():
    turns = [(row[0] + FIRST_KICK_S, TURN_S) for row in SWEEPS] + [(CREEP_KICK_S, CREEP_TURN_S)]
    ends = [row[1] for row in SWEEPS] + [CREEP[1]]
    kicks = [s + turn_s * (np.arange(34)[:, None] + [0, SECOND_KICK]).ravel() for s, turn_s in turns]
    return np.concatenate([k[k < end] for k, end in zip(kicks, ends)])


def carriage():
    frame_db, rail_db, case_db, slide_db = sweep_levels()
    kicks = pole_kicks()
    strength_db = rng.normal(0, 2.0, len(kicks))
    throb = dying(kicks, strength_db, .04, rise_s=0.0023)
    throb /= np.sqrt(np.mean(throb[throb > 0] ** 2))
    push = np.zeros(N)
    push[(kicks * SR).astype(int)] = 30 * magnitude_from_level(strength_db)
    shake = .3 * noise()
    early = np.arange(N) < CREEP[0] * SR / 2
    fast_rail = colour(FAST_KICK * push + shake, resonant(FAST_RAIL))
    rail = np.where(early, fast_rail, colour(push + shake, resonant(RAIL)))
    for start, *_ in SWEEPS[1:4:2]:
        rail_db -= 10.0 * np.interp(TIME_S - start, [-.01, 0, LATE_RING_S, 1.2 * LATE_RING_S], [0, 1, 1, 0])
    rail_db += np.interp(TIME_S, *np.transpose(CREEP_RING), left=0)
    rail *= magnitude_from_level(rail_db) / np.sqrt(uniform_filter1d(rail ** 2, size=8820))
    frame = colour(noise() * (0.41 + 0.41 * throb) * magnitude_from_level(frame_db), resonant(FRAME))
    drive = noise() * (0.59 + 0.13 * throb) * magnitude_from_level(case_db)
    out_way = np.searchsorted([row[0] - .02 for row in SWEEPS], TIME_S) % 2
    case = colour(drive * out_way, resonant(CASE[0])) + colour(drive * (1 - out_way), resonant(CASE[1]))
    drag = (0.74 + 0.23 * throb) * magnitude_from_level(slide_db + 1.2 * drift(47)) + ribs()
    slide = colour(noise() * drag, lifted(SLIDE, SLIDE_MODES))
    body = filtered(rail + frame + case, lifted([(20, 0), (20000, 0)], HOLLOW))
    return body + np.where(early, slide, filtered(slide, lifted(LID_OPEN)))


def feed_levels():
    spans = [np.transpose([[start, start + SPIN_UP_S, end - SLOW_S, end - STOP_S, end],
                           db + SPEED_DB,
                           db + HISS_RE_DB + HISS_FOLLOWS * SPEED_DB,
                           db + HUM_RE_DB + HUM_STRAIN_DB,
                           db + np.array(BRAKE_HUM_DB)]) for start, end, db, _ in FEED]
    grind_db, hiss_db, hum_db, brake_db = in_time(spans)
    hiss_db = hiss_db + SHEET_GONE_DB * (np.arange(N) > SHEET_GONE_S * SR)
    return grind_db, hiss_db, hum_db, brake_db


def in_long_feed(s):
    return any(start < s < end - STOP_S and end - start > LONG_FEED_S for start, end, *_ in FEED)


def knocks():
    rows = [(s, db, CLUNK_THUD_DB, CLUNK_SNAP_DB) for s, _, _, db in FEED[1:]]
    rows += [(s, db, CATCH_THUD_DB, snap_db) for s, db, snap_db in TICKS]
    for s, db, touch_db, snap_db in DROPS:
        db, snap_db = db + CAM_RATTLE_DB, snap_db - CAM_RATTLE_DB
        rows.append((s - TOUCH_LEAD_S, db + touch_db, DROP_THUD_DB, snap_db + TOUCH_DULL_DB))
        rows.append((s, db, DROP_THUD_DB, snap_db))
    for s, db, rebound_db in CATCHES:
        db += CAM_RATTLE_DB
        rows.append((s, db, CATCH_THUD_DB, CATCH_SNAP_DB))
        rows.append((s + REBOUND_S, db + rebound_db, CATCH_THUD_DB, CATCH_SNAP_DB))
    for hits, followers in ((DROPS, NEAR_DROP), (CATCHES, AFTER_CATCH)):
        rows += [(hit[0] + lag, *levels) for hit in hits for lag, *levels in followers
                 if in_long_feed(hit[0] + lag)]
    return np.transpose(rows)


def cam():
    out, t = np.zeros((2, N)), np.arange(3500) / SR
    drops = [hit for s, db, touch_db, _ in DROPS for hit in ((s, db), (s - TOUCH_LEAD_S, db + touch_db))]
    catches = [hit for s, db, rebound_db in CATCHES for hit in ((s, db), (s + REBOUND_S, db + rebound_db))]
    for hits, modes in ((drops, DROP_RING), (catches, CATCH_RING)):
        hz, mode_db, t60 = np.array(modes).T[..., None]
        rise = 1 - np.exp(-t * hz / CAM_RISE_CYCLES)
        shape = magnitude_from_level(mode_db - 60 * t / np.maximum(t60, .005)) * rise
        phase = [[[0]], [[1]]] * rng.uniform(0, 2 * np.pi, hz.shape)
        paths = shape * np.sin(2 * np.pi * hz * t + phase)
        paths /= np.abs(paths[0].sum(axis=0)).max()
        for (s, db), vary in zip(hits, rng.standard_normal((len(hits), len(modes)))):
            start = int(s * SR)
            out[:, start:start + len(t)] += magnitude_from_level(db + CAM_VARIES_DB * vary) @ paths
    return magnitude_from_level(CAM_RING_DB) * out


def feed():
    grind_db, hiss_db, hum_db, brake_db = feed_levels()
    gearbox = lifted(GEARBOX, GEAR_MODES)
    chatter = magnitude_from_level(2.3 * drift(160) + .8 * drift(25))
    grind = colour(noise() * chatter * magnitude_from_level(grind_db + 0.2), gearbox * band(170, 4800))
    hiss = colour(noise() * chatter ** 0.26 * magnitude_from_level(hiss_db + 2.5), gearbox * band(4400, 17000))
    hum = colour(noise() * magnitude_from_level(hum_db), resonant(HUM))
    hum += colour(noise() * magnitude_from_level(brake_db), resonant(BRAKE_HUM))
    hard = np.interp(TIME_S, *np.transpose(BARE_GEARS))
    rattle = blows(*knocks(), 0.028, gearbox, trim_db=-4.5, crack_db=12.0, hard=hard)
    return grind + hiss + hum + cam() + rattle


def scene():
    near = magnitude_from_level(2.5) * two_ports(feed() + carriage() + handling() + hinge())
    return near + room(near) + grip() + microphone_hiss() + whine() * magnitude_from_level([[-2.5], [2.5]])


def band_limit(x):
    return signal.sosfilt(signal.butter(12, 16470, fs=SR, output="sos"), x)


def record(dry):
    top_cut = signal.cheby2(10, 60, 16900, fs=SR, output="sos")
    return band_limit(signal.sosfilt(top_cut, dry))


dry = scene()
out = record(dry)
wrap_up_sound(out)
```